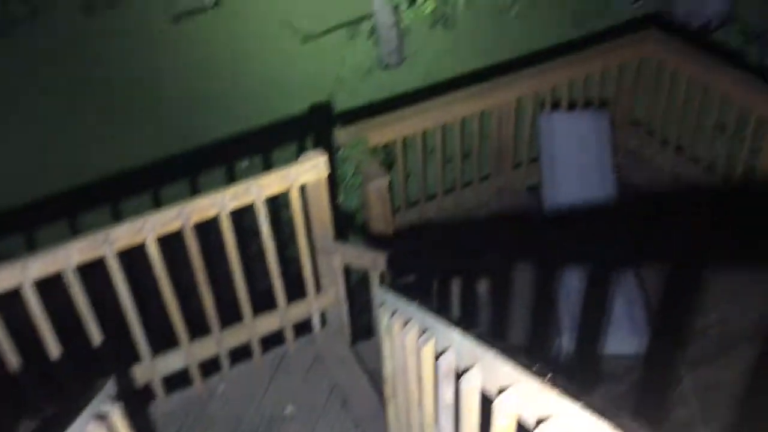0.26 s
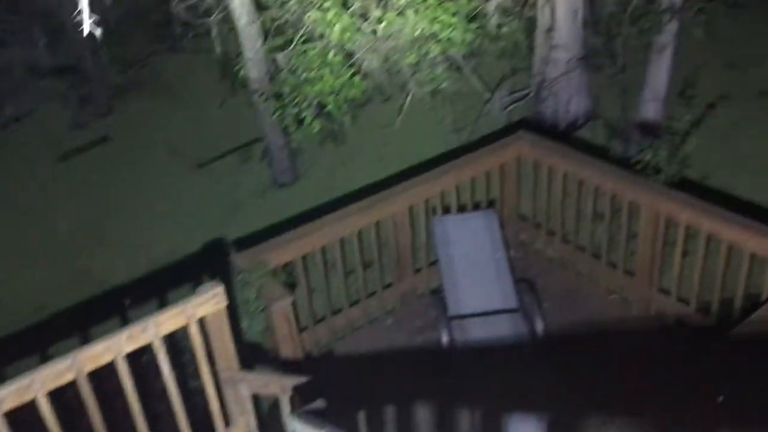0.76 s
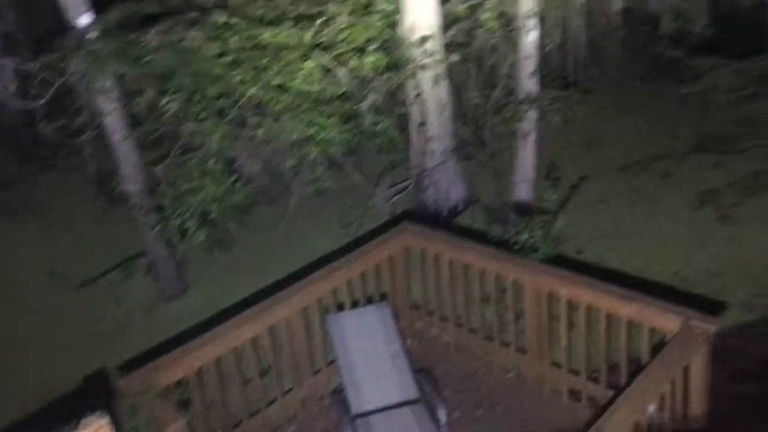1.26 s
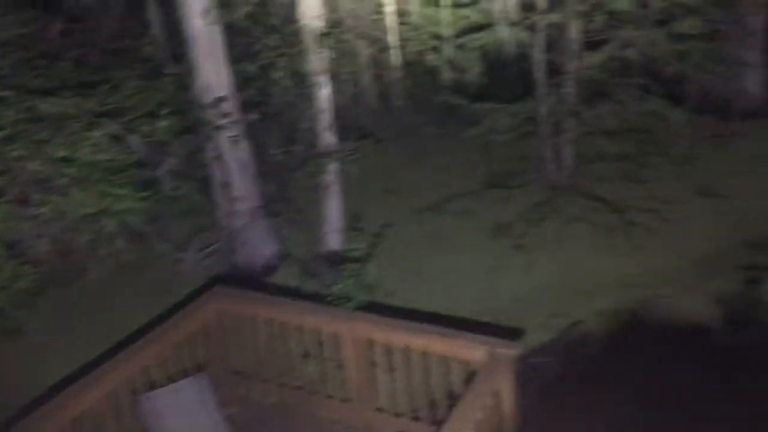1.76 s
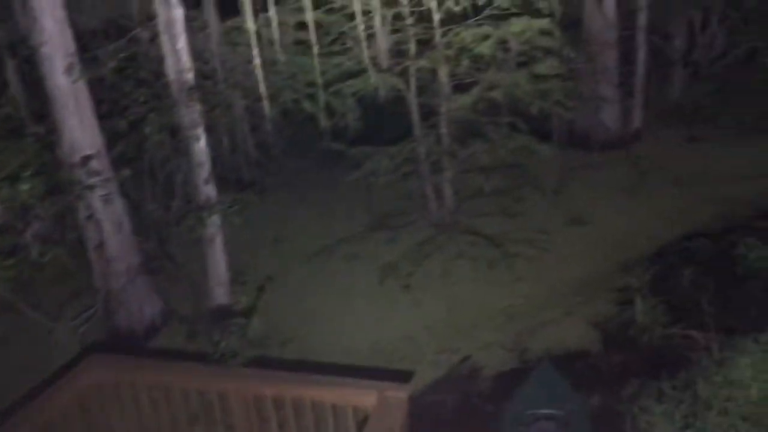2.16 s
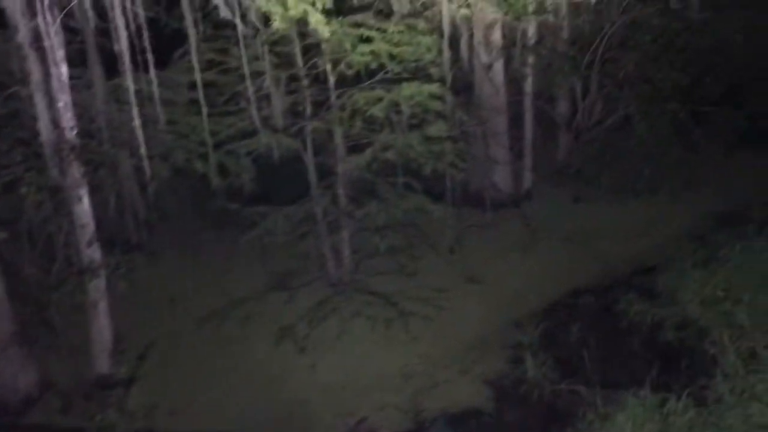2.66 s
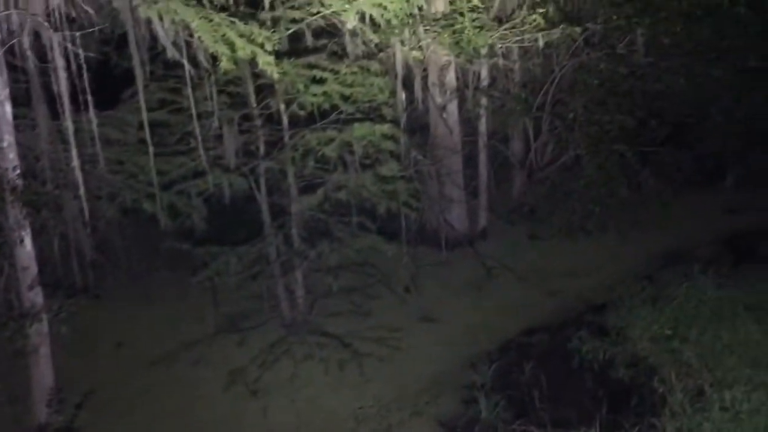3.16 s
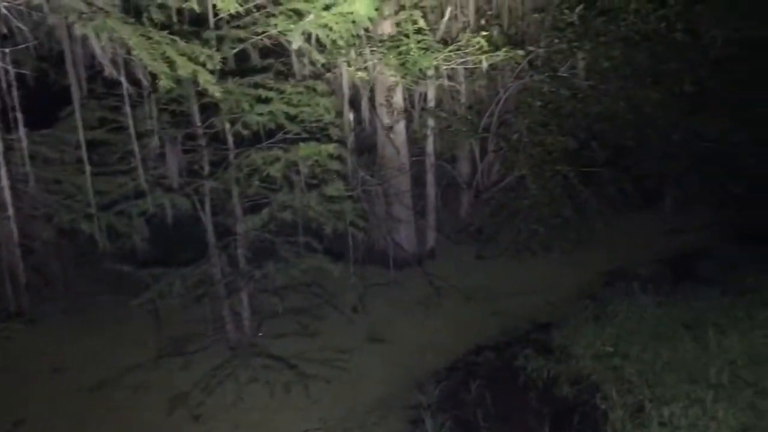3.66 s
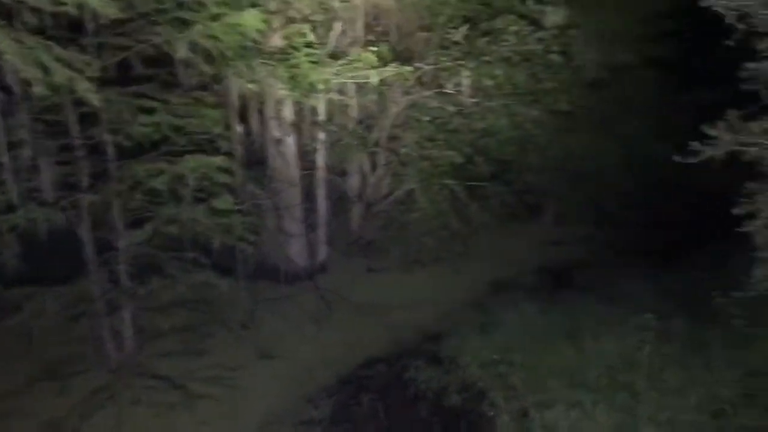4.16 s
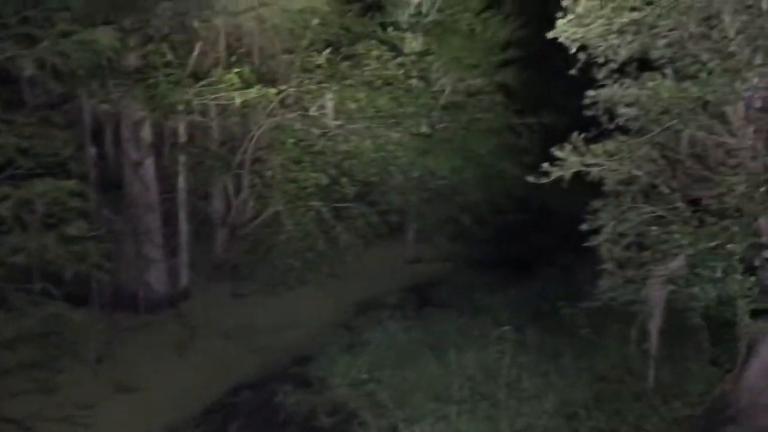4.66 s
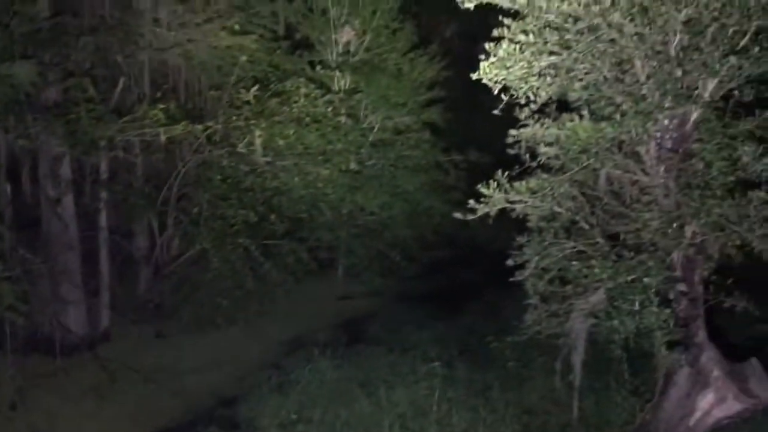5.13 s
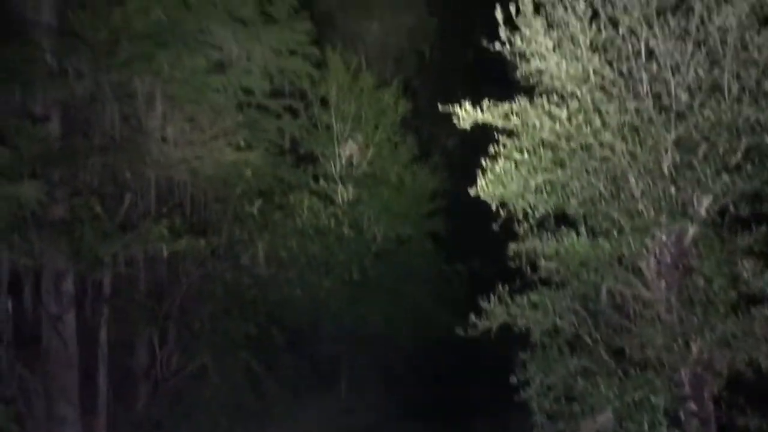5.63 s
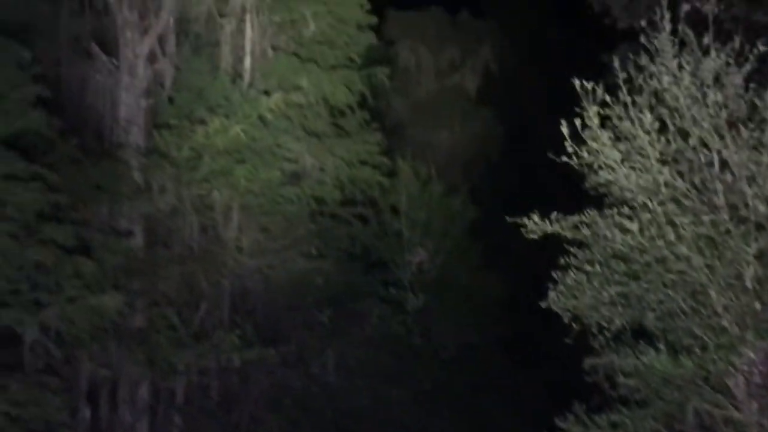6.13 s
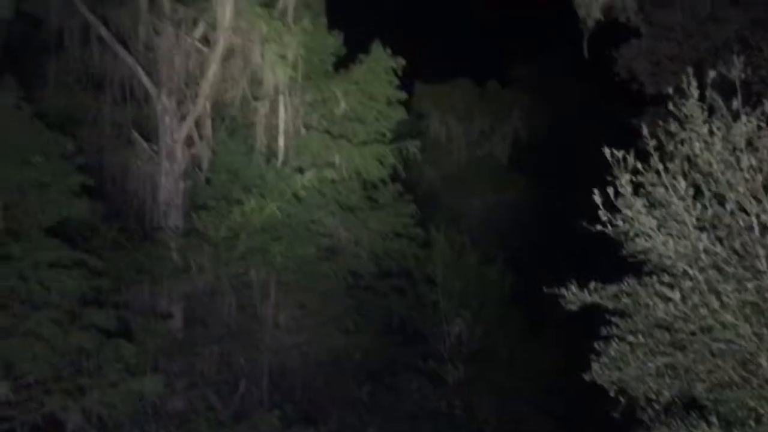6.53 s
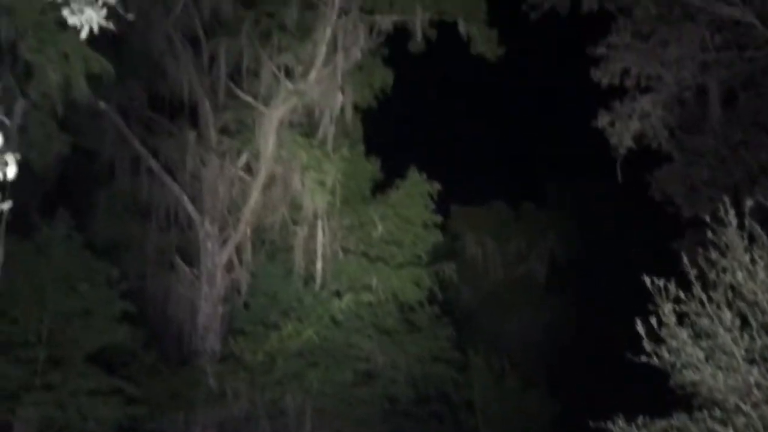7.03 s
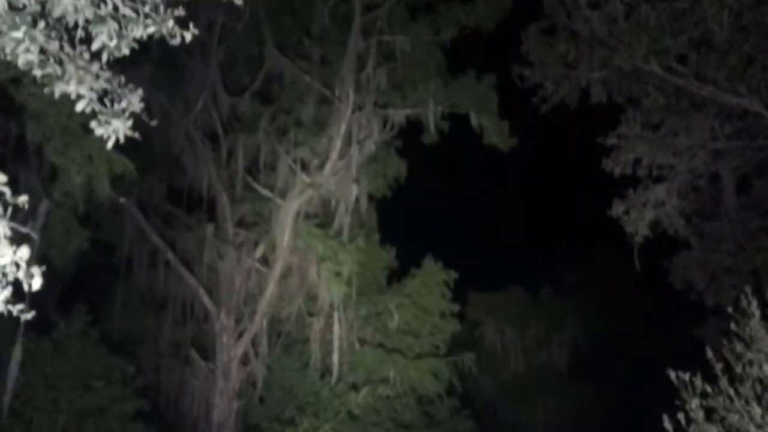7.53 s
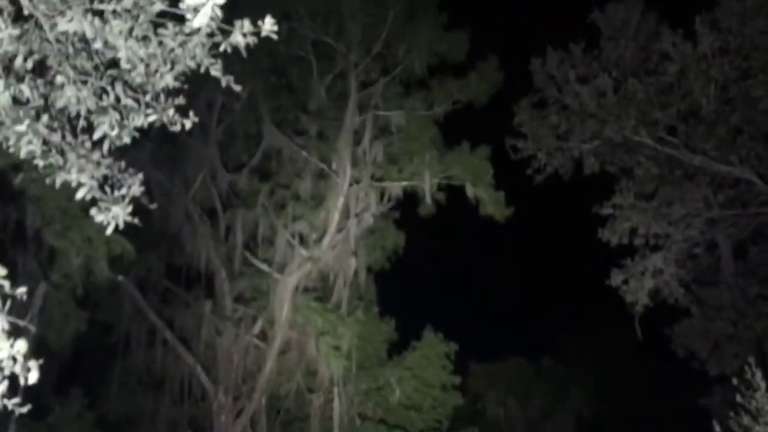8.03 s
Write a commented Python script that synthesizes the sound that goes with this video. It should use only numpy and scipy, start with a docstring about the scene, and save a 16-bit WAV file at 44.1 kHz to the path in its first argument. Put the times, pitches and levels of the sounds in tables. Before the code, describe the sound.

Heard from a deck above a swamp at night, a crowd of frogs croaks continuously, with short raspy calls poking out at uneven intervals. A nearby cricket chirps in runs over a shrill blur of others. A katydid buzzes thinly, then drops out near the end. A faint distant engine swells past the middle, slowly rising in pitch, and recedes into a quiet low rumble. The trees add short scattered echoes.

```python
"""A swamp at night, from a deck: tree frogs croak over one another among the trunks.
Each croak is a swelling train of clicks that slows down and rings two resonances of the frog.
Crickets make a high drone with their wings, one chirps close by, a katydid buzzes and stops.
Behind them are a low rumble, a thin insect hiss and a far engine that slowly speeds up."""
import sys
import numpy as np
from scipy import signal
from scipy.fft import rfft, irfft, next_fast_len
from scipy.io import wavfile

SR = 44100
rng = np.random.default_rng(int(sys.argv[2]) if len(sys.argv) > 2 else 0)


def transcribe(u):
    """Save the signal u as a 16-bit wav file named by the first command-line argument.

    u: samples, shape (n,) or (channels, n), limited to [-1, 1]; the rate is SR.
    q: integer samples, one column per channel.
    """
    v = np.clip(np.atleast_2d(u).T, -1, 1)
    q = np.round(v * 32767).astype(np.int16)
    wavfile.write(sys.argv[1], SR, q)


N = 365588
TIME = np.arange(N) / SR


def amp(db):
    """Decibels to gain."""
    return 10 ** (np.asarray(db) / 20)


def unit_rms(x):
    """Scales to rms 1."""
    return x / np.sqrt(np.mean(x ** 2) + 1e-20)


def curves(rows):
    """Each column after the first, interpolated over time."""
    times_s, *columns = np.transpose(rows)
    return [np.interp(TIME, times_s, column) for column in columns]


def noise(spectrum):
    """Noise of rms 1, shaped by (Hz, dB) points."""
    hz, db = np.transpose(spectrum)
    size = next_fast_len(N)
    gain = amp(np.interp(np.log(np.fft.rfftfreq(size, 1 / SR) + 1), np.log(hz), db))
    return unit_rms(irfft(rfft(rng.standard_normal(N), size) * gain, size)[:N])


def drift(cutoff_hz):
    """Slow random curve of rms 1."""
    hz = np.fft.rfftfreq(2048, TIME[-1] / 2048)
    spectrum = rfft(rng.standard_normal(2048)) / (1 + (hz / cutoff_hz) ** 4)
    return np.interp(TIME, np.linspace(0, TIME[-1], 2048), unit_rms(irfft(spectrum)))


def add(mix, start_s, sound):
    """Mixes a sound in, cropped to fit."""
    start = round(start_s * SR)
    sound = sound[max(-start, 0):]
    part = mix[max(start, 0):][:len(sound)]
    part += sound[:len(part)]


def resonate(x, hz, width_hz):
    """A resonance that follows the curve hz."""
    carrier = np.exp(2j * np.pi * np.cumsum(hz) / SR)
    pole = np.exp(-np.pi * width_hz / SR)
    return (carrier * signal.lfilter([1 - pole], [1, -pole], x / carrier + 1e-18)).real


def tree_echoes(t60_s, count):
    """Impulse response of energy 1: scattered echoes from trees and water."""
    delay_s = rng.random(count) ** 2 * .35
    gains = rng.standard_normal(count) * amp(-60 * delay_s / t60_s)
    taps = np.bincount((delay_s * SR).astype(int), gains, SR // 2)
    return taps[:int(.35 * SR)] / np.linalg.norm(taps)


def with_echoes(x, wet, t60_s, count):
    """The direct sound plus its echoes."""
    return x + wet * signal.oaconvolve(x, tree_echoes(t60_s, count))[:N]


# Each row: frequency in Hz, relative spectral density in dB.
RUMBLE_SPECTRUM = [(18, -41), (30, -16.5), (47, 0), (70, 3.5), (110, -4.5), (160, -8.5), (260, -12),
                   (350, -15.5), (480, -24), (850, -28), (1400, -46)]
HISS_SPECTRUM = [(4000, -11), (7400, 4), (8500, 0.5), (9500, -9.5), (10400, -21.5), (11300, -7.5),
                 (12300, 2.5), (13200, 4.5), (13900, -6), (14400, -20), (15700, -20)]
# Each row: time in seconds, relative level in dB.
RUMBLE_LEVELS = [(0, -66), (2.2, -67.5), (3.5, -66), (6.2, -64.5), (8.3, -66)]


def night_air(rumble_gain_db=7, hiss_db=-73.5):
    """Low rumble from far away and the thin hiss of small insects."""
    rumble = amp(curves(RUMBLE_LEVELS)[0] + rumble_gain_db) * noise(RUMBLE_SPECTRUM)
    hiss = amp(hiss_db + .5 * drift(6.4)) * noise(HISS_SPECTRUM)
    return rumble + hiss


# Each row: frequency in Hz, mean rms level in dB.
HUM_TONES = [(86.5, -68.5), (405, -90.5)]


def hum():
    """Two low tones that waver in level and phase."""
    return np.sqrt(2) * sum(
        amp(db + 3.3 * drift(1.9)) * np.sin(2 * np.pi * hz * TIME + .72 * drift(1.56))
        for hz, db in HUM_TONES)


# Each row: time in seconds, base level in dB.
ENGINE_LEVELS = [(0, -79.5), (1.8, -77), (2.9, -62.5), (4.2, -60.5), (6.3, -55.5), (7.1, -58), (8.3, -64.5)]
# Each row: multiple of the firing rate, gain in dB, time of one throb crest in seconds, loss in dB/s.
ENGINE_PARTIALS = [(1, 0.5, 2.86, 0), (2, -0.5, 2.92, 1.25), (2.5, -7.5, 4.47, 1.14), (3, 2.5, 3.57, 3.5)]


def far_engine(start_hz=81.2, rise_hz_per_s=1.99, throb_s=1.285, throb_db=2, fading_db=1.8):
    """An engine speeds up, throbs, and dulls as it recedes."""
    firing_hz = (start_hz + rise_hz_per_s * TIME) * (1 + .00196 * drift(2.8))
    cycles = np.cumsum(firing_hz) / SR
    level_db = curves(ENGINE_LEVELS)[0]
    out = np.zeros(N)
    for multiple, gain_db, crest_s, loss_db_per_s in ENGINE_PARTIALS:
        sway_db = throb_db * np.cos(2 * np.pi * (TIME - crest_s) / throb_s) + fading_db * drift(2.2)
        envelope = amp(level_db + gain_db + sway_db - loss_db_per_s * TIME)
        out += envelope * np.sin(2 * np.pi * multiple * cycles)
    return out


# Each row: time in seconds, relative level in dB, pitch near the top of a stroke in Hz.
KATYDID_SONG = [(0.1, -71.5, 8150), (0.67, -70.5, 8250), (1.64, -62.5, 8290), (2.38, -68.5, 8290),
                (2.99, -66, 8290), (4.04, -71, 8280), (4.16, -68.5, 8280), (5.82, -70, 8260),
                (6.0, -72, 8250)]


def katydid(beat_hz=60.3, sag_hz=420, return_db=-12, return_hz=7880, stop_s=6.18, fade_s=.13):
    """Each wing beat is a loud stroke that arches in pitch, then a soft, lower return."""
    level_db, top_hz = curves(KATYDID_SONG)
    beats = np.cumsum(beat_hz * (1 + .0024 * drift(5.3))) / SR
    progress = beats % 1
    stroke = np.exp(-((progress - .33) / .2) ** 2)
    back = amp(return_db) * np.exp(-((progress - .8) / .14) ** 2)
    stroke_hz = top_hz + 45 - sag_hz * (3 * progress - 1) ** 2
    hz = np.where(progress < .65, stroke_hz, return_hz) + 12 * drift(50)
    cycles = np.cumsum(hz) / SR
    cycles -= cycles[np.searchsorted(beats, np.floor(beats))]  # phase resets every beat
    buzz = unit_rms((stroke + back) * np.sin(2 * np.pi * cycles))
    buzz = unit_rms(with_echoes(buzz, wet=.36, t60_s=.2, count=200))
    flutter_db = 1.5 * drift(15)
    fade = np.clip((stop_s - TIME) / fade_s, 0, 1)
    return amp(level_db + 2.5 + flutter_db) * buzz * fade


def chirp(hz, stroke_s, sag, count=5):
    """A cricket's wing strokes, each a short tone that sags in pitch and starts at a new phase."""
    strokes = np.arange(int(count * stroke_s * SR)) / SR / stroke_s
    from_middle = strokes % 1 - .5
    detune, phase = rng.standard_normal((2, count))[:, strokes.astype(int)]
    pulse = np.sin(np.pi * np.clip(from_middle / .8 + .5, 0, 1))
    swell = np.minimum(.6 + .25 * strokes, 1)
    cycles = np.cumsum(hz * (1 + .0014 * detune - sag * from_middle)) / SR
    return pulse * swell * np.sin(2 * np.pi * (cycles + phase))


# Each row: pitch in Hz, chirp period in seconds, direct amplitude in dB.
MID_CRICKETS = [(6950, .368, -58.5), (6646, .34, -54), (6570, .29, -55)]
# Each row: frequency in Hz, relative spectral density in dB.
FAR_CRICKET_SPECTRUM = [(4300, -24), (5000, -35), (5500, -18.5), (6000, -5.5), (6400, -1), (6680, 1.5),
                        (6860, -4.5), (6980, -6), (7100, -14), (7400, -22.5), (7800, -56.5)]
# Each row: time in seconds, level in dB.
FAR_CRICKET_LEVELS = [(0, -52), (1.3, -53.5), (2.6, -54.5), (3.4, -53.5), (5, -54.5), (7, -54.5),
                      (8.3, -55)]


def cricket_crowd(jitter_s=.011):
    """Three crickets on their own pitch and beat, over a blur of countless far ones."""
    chirps = np.zeros(N)
    for hz, period_s, db in MID_CRICKETS:
        for beat_s in (np.arange(-1, 32) + rng.random()) * period_s:
            start_s = beat_s + jitter_s * rng.standard_normal()
            add(chirps, start_s, amp(db) * chirp(hz, stroke_s=.0251, sag=.013))
    chirps = with_echoes(chirps, wet=.48, t60_s=.3, count=200)
    blur = noise(FAR_CRICKET_SPECTRUM) * amp(.54 * drift(36) + .5 * drift(5))
    return chirps + amp(curves(FAR_CRICKET_LEVELS)[0]) * blur


# Each row: first and last chirp in seconds, first and last direct amplitude in dB.
CHIRP_RUNS = [(.267, 0.6, -49, -46), (1.06, 1.059, -46, -48), (1.532, 2.9, -49, -58),
              (3.335, 4.96, -45, -50), (5.275, 5.99, -47.5, -48.5), (6.42, 8.126, -50, -44)]


def near_cricket(hz=6208, beat_s=.333, scatter_db=1.4):
    """One cricket chirps in runs that swell or tire, softened by the leaves around it."""
    out = np.zeros(N)
    for first_s, last_s, first_db, last_db in CHIRP_RUNS:
        count = 1 + round(abs(last_s - first_s) / beat_s)
        for middle_s, db in np.linspace((first_s, first_db), (last_s, last_db), count):
            sound = chirp(hz, stroke_s=.0262, sag=.022)
            gain = amp(db + scatter_db * rng.standard_normal())
            add(out, middle_s - len(sound) / SR / 2, gain * sound)
    return with_echoes(out, wet=.55, t60_s=.26, count=200)


def larynx_click(upper_hz, lower_hz, lower_db, half_width_hz=440, top_hz=4100):
    """One click of the larynx, rung by the frog's two resonances."""
    hz = abs(np.fft.fftfreq(1024, 1 / SR)) + 1
    lower = amp(lower_db - 1) / (1 + ((hz - lower_hz) / half_width_hz) ** 2)
    upper = 1 / (1 + ((hz - upper_hz) / half_width_hz) ** 2)
    rolloff = np.sqrt((1 + (.85 * lower_hz / hz) ** 14) * (1 + (hz / top_hz) ** 14))
    log_gain = np.log((lower + upper) / rolloff + 1e-4)
    minimum_phase = np.exp(np.conj(signal.hilbert(log_gain)))
    return np.fft.ifft(minimum_phase).real[:400]


def croak(length_s, upper_hz, lower_hz, lower_db, roughness, first_hz=400, last_hz=250):
    """Clicks that swell, slow down and break off; a rough frog spaces them unevenly."""
    slip, strength = rng.standard_normal((2, 160))
    pace = np.exp(.16 * roughness * rng.standard_normal())
    progress = np.linspace(0, 1, int(length_s * SR))
    click_hz = pace * (last_hz + (first_hz - last_hz) * (1 - progress) ** 2)
    onsets = np.searchsorted(np.cumsum(click_hz) / SR, np.arange(len(slip)) + .045 * roughness * slip)
    clicks = np.bincount(onsets, amp(2.2 * roughness * strength), len(progress) + 1)[:len(progress)]
    swell = np.interp(progress, [0, .4, .82, 1], [.13, .34, 1, .42])
    rasp = unit_rms(signal.fftconvolve(clicks * swell, larynx_click(upper_hz, lower_hz, lower_db)))
    # The vocal sac sings one narrow note that arches as it fills.
    fill = np.sin(np.linspace(0, 2.4, len(rasp)))
    sac_note = unit_rms(resonate(rasp, upper_hz * (1 + .04 * (fill - .8)), width_hz=60))
    return unit_rms(rasp + amp(-7) * roughness * sac_note)


# Each row: time in seconds, relative level in dB.
FAR_FROG_LEVELS = [(0.0, -49), (0.21, -55), (0.46, -56), (0.6, -50), (0.92, -53.5), (1.52, -51),
                   (1.96, -55.5), (2.28, -51), (2.77, -50), (3.07, -54), (3.32, -56), (3.58, -49.5),
                   (4.06, -54), (4.34, -60.5), (4.52, -53.5), (7.41, -50.5), (7.69, -50), (8.29, -50.5)]


def far_frogs(count=150, gain_db=.1, cutoff_hz=3500):
    """Many frogs in three far corners of the swamp, each corner with its own echoes."""
    corners = np.zeros((3, N))
    for k, (slip, loudness, pitch, depth) in enumerate(rng.uniform(-1, 1, (count, 4))):
        call = croak(length_s=.17, upper_hz=2490 * np.exp(.11 * pitch), lower_hz=1300,
                     lower_db=-4.5 + 3 * depth, roughness=.75)
        start_s = (k + slip / 2) / count * (TIME[-1] + .3) - .3
        add(corners[k % 3], start_s, amp(.52 * loudness) * call)
    chorus = sum(with_echoes(corner, wet=1.86, t60_s=1, count=500) for corner in corners)
    dulled = signal.sosfilt(signal.butter(3, cutoff_hz, fs=SR, output="sos"), chorus)
    return amp(curves(FAR_FROG_LEVELS)[0] + gain_db) * unit_rms(dulled)


# Each row: rough peak time in seconds, relative level in dB, upper and lower resonance in Hz,
# distance from 0 to 1.
NEAR_CROAKS = [(0.097, -42, 2357, 1360, 0.68), (0.536, -43, 2286, 1350, 0.78), (0.71, -54, 2460, 1370, .85),
               (1.204, -55.5, 3150, 1370, 0.53), (1.72, -49.5, 2660, 1360, 0.92),
               (2.085, -55.5, 3100, 1370, 0.7), (2.281, -49, 2430, 1310, .72),
               (2.453, -55, 3000, 1370, 0.66), (2.62, -54, 2590, 1370, .85), (2.871, -53, 2220, 1370, 0.72),
               (3.41, -46, 2460, 1270, 0.83), (3.699, -50.5, 2680, 1370, 0.97),
               (4.39, -48.5, 2330, 1280, 0.67), (4.458, -46, 2210, 1240, 0.7),
               (4.65, -48.5, 2190, 1140, 0.52), (4.665, -59, 3320, 1380, .6),
               (4.734, -45, 2390, 1190, 0.69), (4.88, -48.5, 2460, 1250, .62),
               (5.24, -49.5, 2730, 1380, .7), (5.432, -45, 2438, 1320, .78),
               (5.749, -50.5, 2280, 1300, 0.62), (5.944, -54.5, 3140, 1370, 0.55),
               (6.088, -46, 2370, 1300, 0.73), (6.35, -47, 2520, 1350, 0.68),
               (6.7, -49.5, 2330, 1310, 0.64), (6.702, -55, 3250, 1370, 0.65),
               (6.966, -44, 2270, 1220, .68), (7.575, -41, 2210, 1380, 0.3),
               (7.69, -47.5, 2400, 1370, 0.85), (7.86, -48.5, 2390, 1330, 0.99)]


def near_frogs(gain_db=-4.5, lead_in_s=.028):
    """Croaks that stand out; farther ones are longer, rougher and come more by way of the trees."""
    out = np.zeros(N)
    for peak_s, db, upper_hz, lower_hz, distance in NEAR_CROAKS:
        body_s = .06 + .15 * distance
        lower_db = 3 - 15 * distance ** 2
        wet = .93 * distance
        path = wet * tree_echoes(t60_s=.48, count=110)
        path[0] += np.sqrt(1 - wet ** 2)  # direct sound
        call = croak(body_s + lead_in_s, upper_hz, lower_hz, lower_db, roughness=distance)
        heard = signal.fftconvolve(call, path)
        heard *= np.linalg.norm(call) / np.linalg.norm(heard)
        add(out, peak_s - .72 * body_s - lead_in_s, amp(db + gain_db) * heard)
    return out


def scene():
    """Everything heard from the deck, in mono."""
    frogs = near_frogs() + far_frogs()
    insects = near_cricket() + cricket_crowd() + katydid()
    return (frogs + insects + far_engine() + hum() + night_air())[None]


def record(dry, cutoff_hz=15750):
    """A steep low-pass."""
    lowpass = signal.firwin(511, cutoff_hz, window=("kaiser", 9), fs=SR)
    return signal.oaconvolve(dry, lowpass[None], "same")


dry = scene()
out = record(dry)
transcribe(out)
```